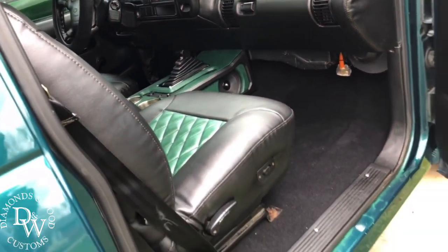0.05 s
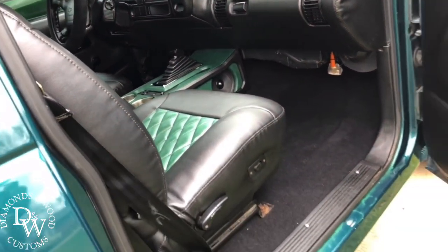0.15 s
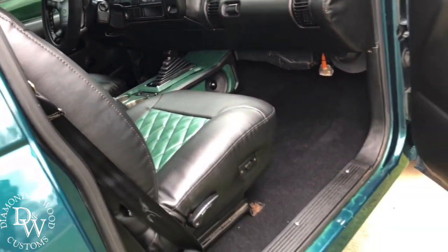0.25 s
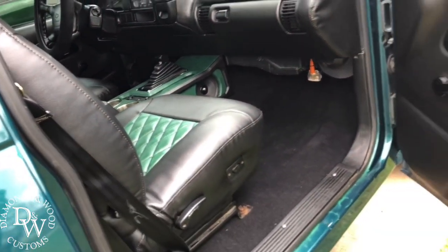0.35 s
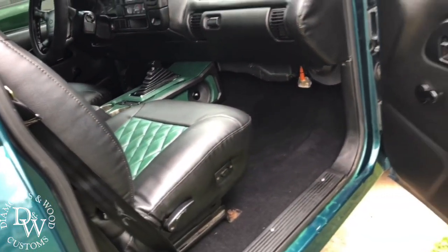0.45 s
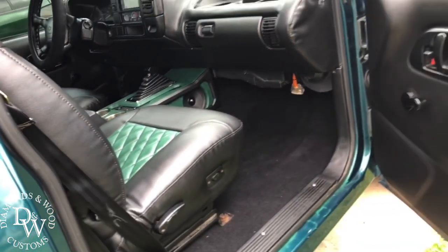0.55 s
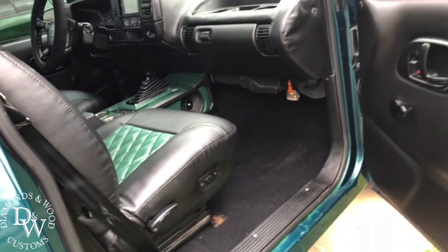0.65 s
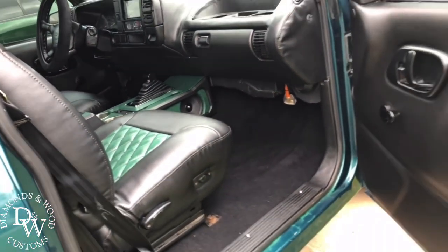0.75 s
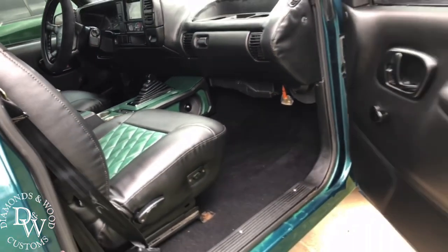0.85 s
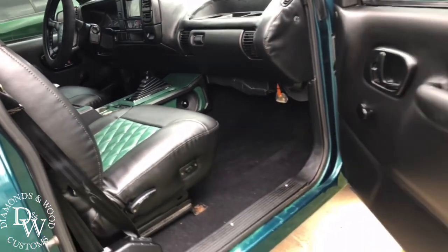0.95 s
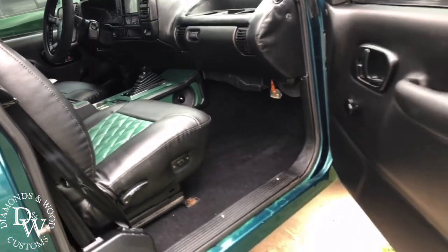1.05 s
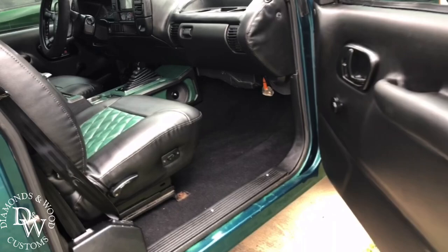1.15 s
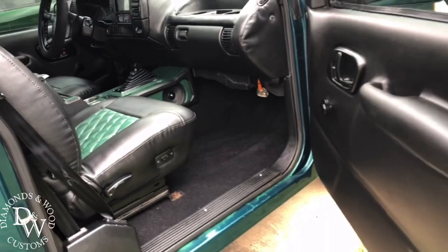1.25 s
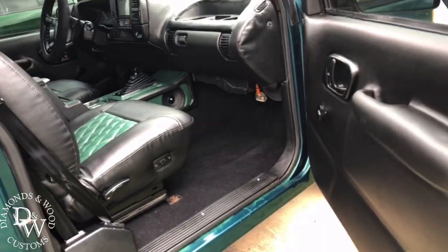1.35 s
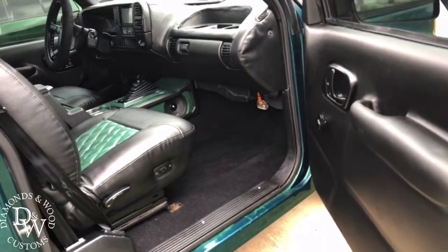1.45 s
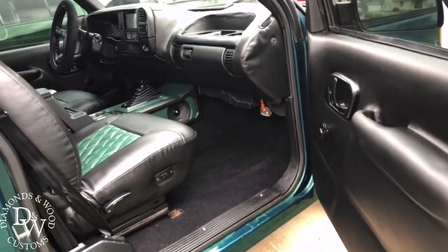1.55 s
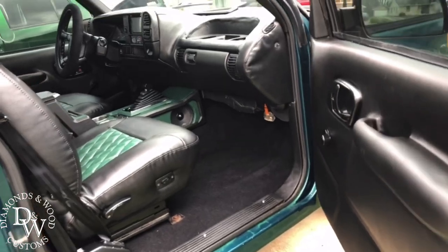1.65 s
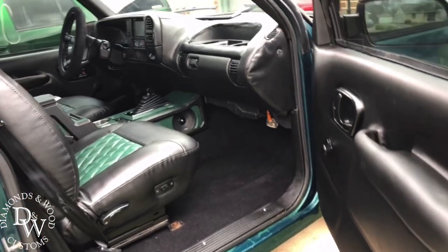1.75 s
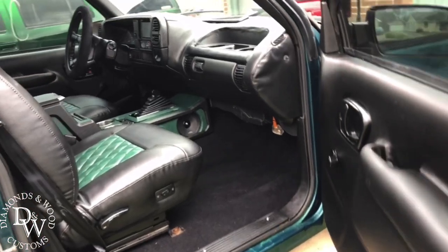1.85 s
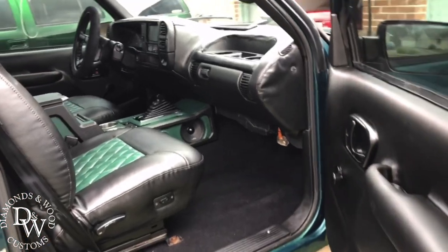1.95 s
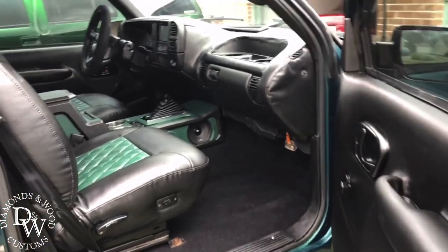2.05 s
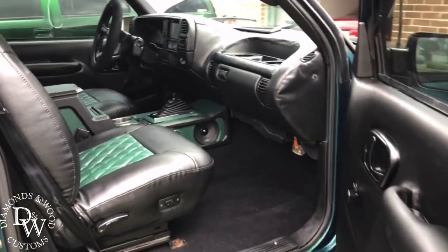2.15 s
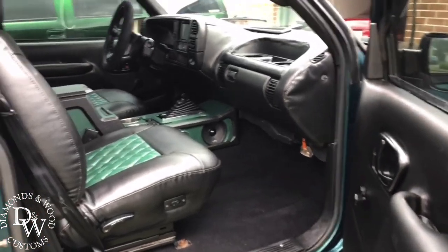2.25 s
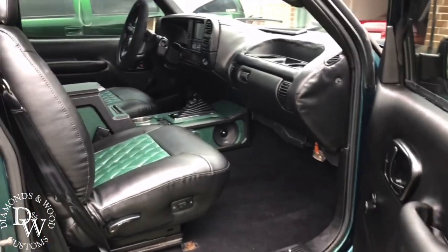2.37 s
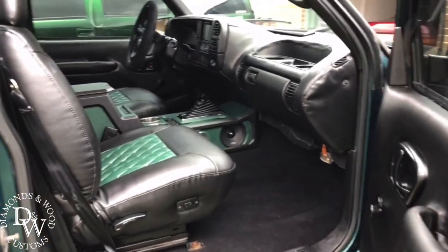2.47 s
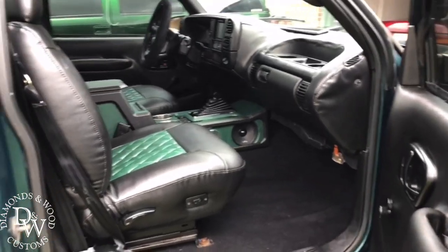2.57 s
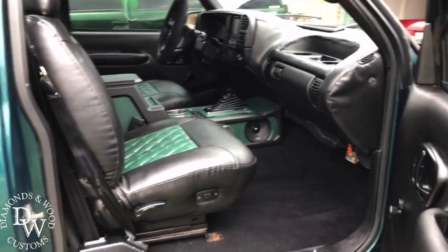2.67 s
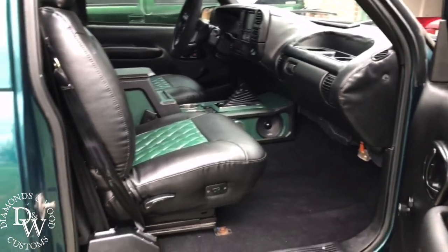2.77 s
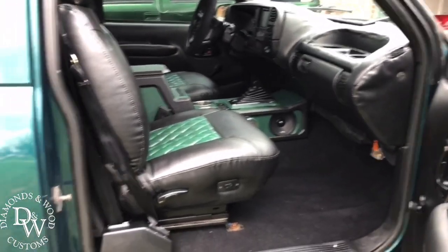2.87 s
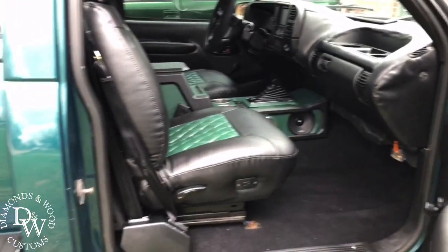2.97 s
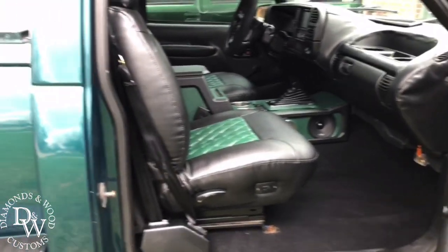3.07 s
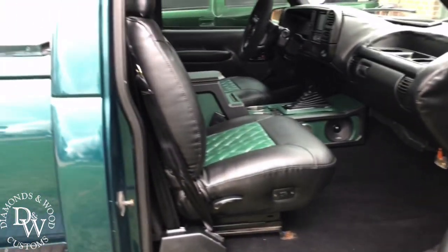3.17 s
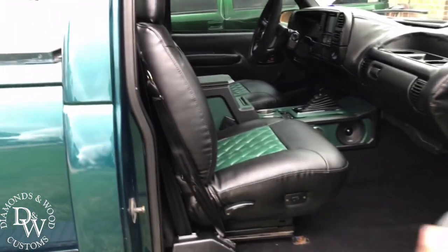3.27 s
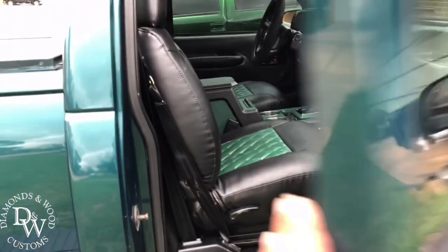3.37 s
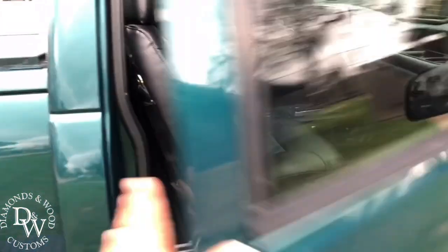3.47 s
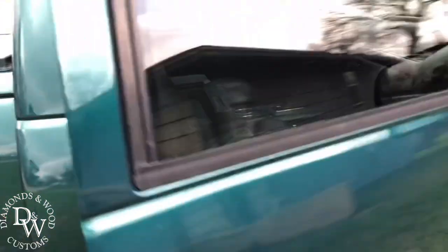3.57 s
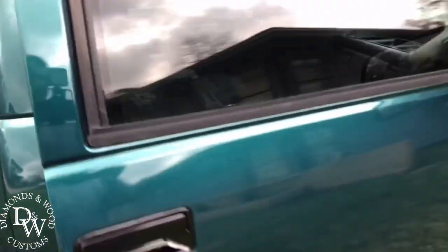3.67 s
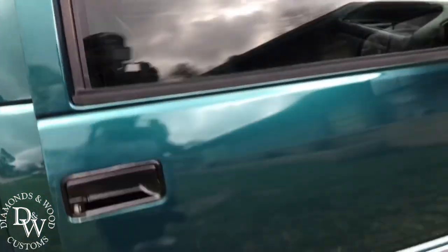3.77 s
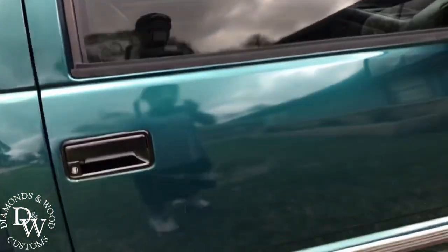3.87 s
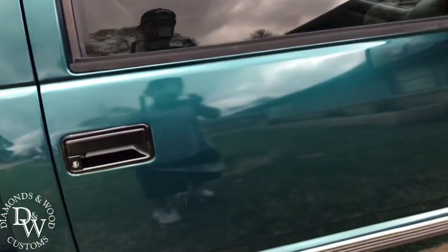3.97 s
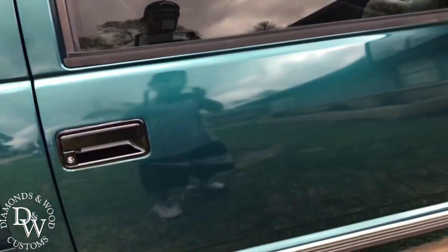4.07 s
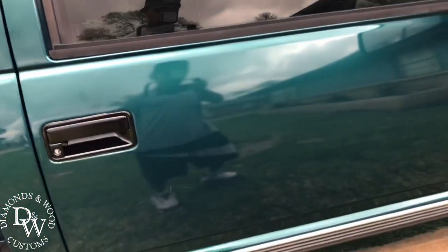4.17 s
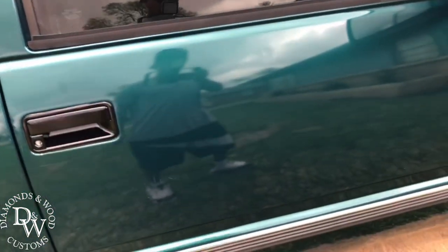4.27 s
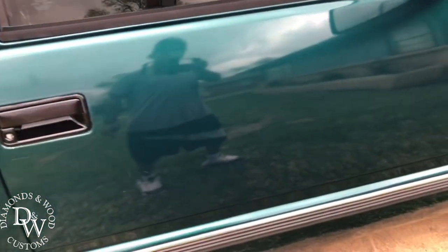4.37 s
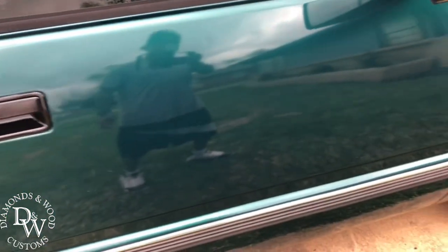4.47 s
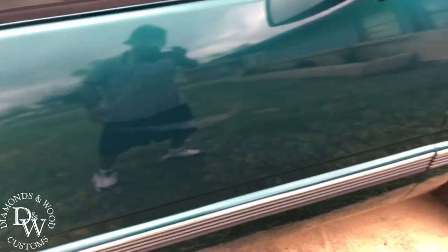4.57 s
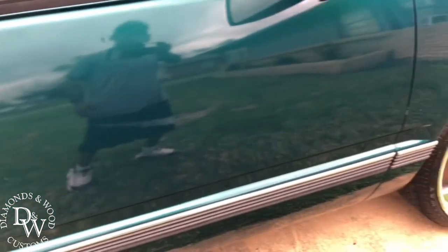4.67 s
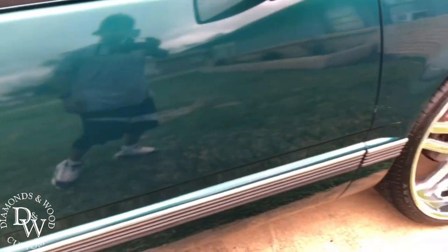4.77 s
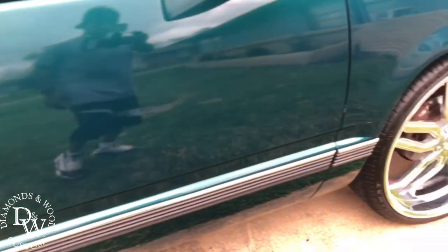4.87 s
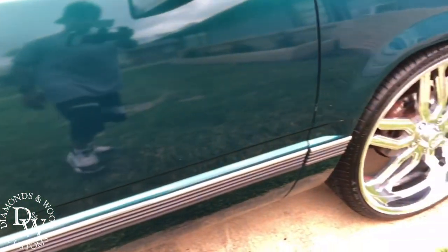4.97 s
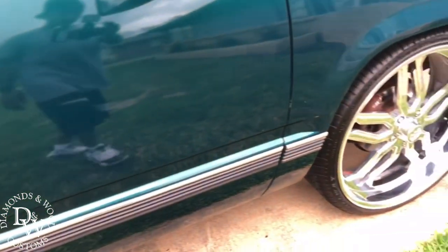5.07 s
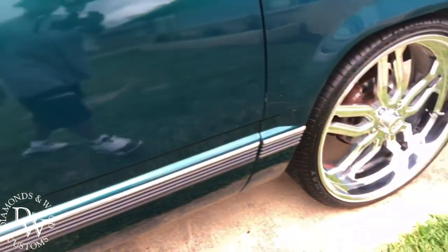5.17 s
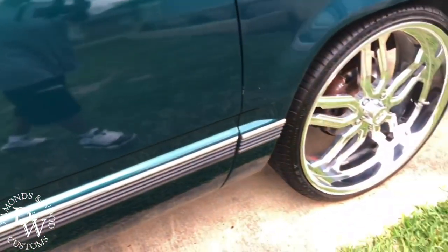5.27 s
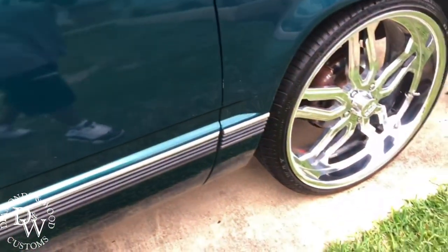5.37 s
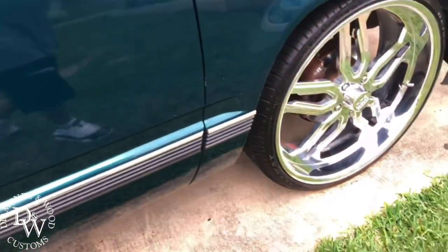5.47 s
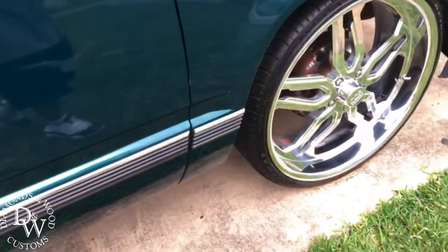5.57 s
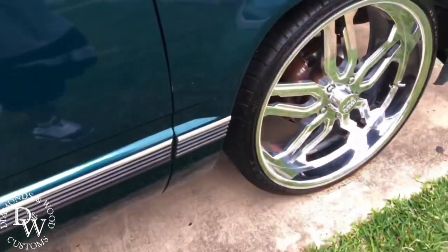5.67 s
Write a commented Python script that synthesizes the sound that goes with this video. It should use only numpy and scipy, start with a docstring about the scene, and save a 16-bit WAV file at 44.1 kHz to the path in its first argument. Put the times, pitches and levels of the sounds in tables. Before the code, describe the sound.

After faint rustling and soft bumps, a truck door is slammed once, thudding against a low, steady outdoor background.

```python
"""Pickup door shut on a driveway

One microphone, an arm's length from the door. The door pushes air ahead of it, the latch meets the
striker, the steel skin lands on its seals and shudders, the window rattles and the cab booms.
Close by are rustling clothes and a few soft bumps and ticks. Farther off are insects in the lawn,
a humming machine, and the rumble and tyre song of traffic."""
import sys
import numpy as np
from scipy import signal
from scipy.io import wavfile

SR = 44100
rng = np.random.default_rng(int(sys.argv[2]) if len(sys.argv) > 2 else 0)


def wav_record(signal):
    """Record a signal, one row per channel, as 16-bit PCM in the file named by sys.argv[1]."""
    frames = np.transpose(np.atleast_2d(signal))
    bounded = np.clip(frames, -1, 1)
    # unit amplitude maps onto the largest positive 16-bit level
    quanta = np.round(bounded * 32767).astype(np.int16)
    wavfile.write(sys.argv[1], SR, quanta)


N = 252252
TIME = np.arange(N) / SR

# traffic on the far road: t/s, rumble level/dB, tyre noise level/dB
TRAFFIC_LEVELS = [(0, -48.5, -51.5), (1.2, -50, -49), (2.9, -48, -49), (3.35, -48.5, -47),
                  (4.3, -45.5, -49.5), (5.15, -48.5, -49.5), (5.72, -47, -50)]
# spectra of the rumble and the tyre noise: f/Hz, relative density/dB
RUMBLE_SPECTRUM = [(25, -12), (45, -6), (65, 3), (85, 2.5), (115, -3), (170, -1.5), (260, -13.5),
                   (400, -17.5), (800, -46)]
TYRE_SPECTRUM = [(150, -8.5), (350, -1.5), (600, -0.5), (850, 3.5), (1120, 2.5), (1500, -4.5),
                 (2100, -12.5), (3200, -24.5), (6000, -28.5), (15000, -80)]
# note of the tyre treads: t/s, f/Hz, level/dB
TYRE_NOTE = [(0, 1110, -63), (1.7, 1115, -66), (2.15, 1126, -52), (2.45, 1086, -59.5), (4.4, 1059, -61),
             (5.2, 897, -72), (5.45, 853, -51.5), (5.72, 815, -55.5)]
# hum of a distant machine: t/s, level/dB
HUM_LEVELS = [(0, -48.5), (2, -54), (4.5, -51.5), (5.72, -51)]

# a sleeve or trouser leg moving near the microphone: peak t/s, level/dB, rise/s, fall/s
CLOTH_MOVES = [(.18, -65.5, .14, 0.088), (.36, -65, 0.054, 0.073), (.65, -61, 0.044, 0.082),
               (.82, -61, 0.053, 0.057), (.95, -63, .04, 0.069), (1.13, -62.5, .025, .04),
               (1.22, -66, .04, 0.049), (1.56, -65.5, 0.07, .08), (1.79, -62.5, 0.11, .16),
               (2.1, -64.5, .04, 0.057), (2.435, -54.5, 0.067, .018), (2.5, -69, .04, .22),
               (3.11, -66, .03, .04), (3.21, -65, .05, 0.032), (3.325, -68, .015, .04),
               (3.455, -66, .012, .015), (3.56, -67, .015, .015), (4.298, -56.5, 0.054, .03),
               (4.41, -66, 0.041, .2), (4.77, -65, .08, .09), (4.99, -63, .025, .03),
               (5.28, -60.5, 0.21, .2), (5.6, -60.5, 0.038, 0.03)]
# hiss of the cloth: f/Hz, relative density/dB
CLOTH_SPECTRUM = [(1500, 2), (3000, 5.5), (6000, 3.4), (8000, 5.2), (11000, 3.5), (15000, 7.3)]
# soft bumps of feet, hinge and rocking body: t/s, level/dB, f/Hz, t60/s
SOFT_BUMPS = [(1.405, -35.5, 103, .08), (1.451, -30, 100, 0.078), (2.069, -31, 102.4, 0.048),
              (2.851, -30, 202, 0.079), (2.889, -31, 193, 0.077), (3.142, -27.5, 181, 0.1),
              (3.178, -30, 152, 0.077), (3.566, -34, 221, 0.15), (3.62, -29, 106, 0.17),
              (4.209, -29, 74.5, 0.22), (4.268, -28, 76, 0.21)]
# ticks of trim and grit: t/s, level/dB, f/Hz, filter width/Hz, t60/s
GRIT_TICKS = [(0.9482, -49.5, 2800, 5000, 0.036), (2.851, -41, 800, 800, 0.033),
              (2.926, -49.5, 6500, 11000, 0.022), (3.002, -55.5, 4300, 700, 0.055),
              (3.267, -60, 4170, 1300, 0.091), (3.335, -60, 4700, 3000, .1),
              (3.4461, -58, 7000, 9000, 0.03), (3.466, -40.5, 2150, 1980, .04),
              (3.467, -49, 5000, 3000, 0.016), (3.623, -47.5, 4800, 12000, 0.02)]
# dull scuffs as the door is reached for and pushed: peak t/s, level/dB, rise/s, fall/s
PUSH_SCUFFS = [(3.39, -48.5, .08, 0.095), (3.64, -44.5, 0.053, 0.052)]
# air driven by the door: f/Hz, relative density/dB
AIR_SPECTRUM = [(100, 4), (250, 3.5), (450, -1.5), (750, 2), (1100, -10), (1500, -7.5), (2500, -21),
                (5000, -34.5), (15000, -47)]

# modes of the parts that ring: f/Hz, relative level/dB, t60/s
CAB_AIR_MODES = [(55, -1.5, 0.25), (90.8, -10, 0.36), (141, -0.5, 0.177), (201.7, -6, 0.13),
                 (242.7, -1.5, 0.13), (291, -2, 0.088)]   # air in the cab and the broad door skin
SHEET_METAL_MODES = [(368, -12, .16), (394, -15, .15), (448, -19, .15), (519, -16, .2), (564, -15, .19),
                     (690, -13, .22), (852, -15, .2), (1495, -20, .2), (1797, -21, .18)]
LATCH_STEEL_MODES = [(2310, -23, .12), (2866, -21, .17), (3800, -24, .12), (4031, -27, .17),
                     (4460, -29, .12), (5980, -20, .07), (6230, -25, .08), (7990, -34, .1),
                     (9370, -26, .09), (11830, -26, .07)]   # latch and striker
PAWL_SNAP_MODES = [(1480, -19, .03), (1810, -12, .045), (2090, -18, .025), (2480, -13, .035),
                   (2830, -14, .035), (3900, -27, .02)]
WINDOW_MODES = [(530, -14, .14), (624, -12, .16), (700, -13, .14), (810, -10, .18), (852, -7, .18)]
# clatter, the crowded overtones between those modes: f/Hz, relative density/dB
SHEET_METAL_CLATTER = [(100, -3.5), (240, 2), (450, -4), (750, -2.5), (1050, -5), (1400, -1.5), (1900, -18),
                       (2700, -27), (3500, -34), (15000, -53)]
LATCH_CLATTER = [(500, 2), (1300, 2.5), (1900, 6), (2500, -1.5), (3200, -2.5), (4100, -1), (6000, -4),
                 (8000, -5.5), (10000, -6.5), (15000, -13)]
WINDOW_CLATTER = [(250, -30), (450, -7), (600, 4), (820, -2), (1000, -20), (1500, -11.5), (2500, -33),
                  (8000, -42)]
# ring time of the clatter: f/Hz, t60/s
SHEET_METAL_DECAY = [(100, 0.44), (400, 0.15), (750, 0.15), (1500, 0.067), (5000, 0.14)]
LATCH_DECAY = [(1000, 0.21), (4000, 0.11), (15000, 0.13)]
WINDOW_DECAY = [(500, 0.11), (3000, 0.093)]
# the door lands (first catch, seals, second catch, hard stop):
# t/s, cab drive/dB, sheet-metal drive/dB, latch drive/dB
DOOR_BLOWS = [(3.8567, -33, -13, -22), (3.863, -25, -15, -25), (3.8698, -15.5, -6.5, -17),
              (3.8738, -10.5, -9, -12.5), (3.886, -42, -9.5, -24), (3.8925, -41, -16, -16),
              (3.9052, -15, -19, -38)]
# dull thumps of the cab as it settles: t/s, drive/dB
CAB_THUMPS = [(3.95, -15.5), (4.03, -31), (4.073, -26), (4.1497, -32.5)]


def from_db(db):
    """Decibels to gain."""
    return 10 ** (np.asarray(db) / 20)


def unit_power(x):
    """Scale to an RMS of one."""
    return x / np.sqrt(np.mean(x ** 2) + 1e-20)


def in_time(rows):
    """Each column of a curve, at every sample."""
    times, *columns = np.transpose(rows)
    return [np.interp(TIME, times, column) for column in columns]


def at_hz(points, hz):
    """Read a curve on a log-frequency axis."""
    frequencies, values = np.transpose(points)
    return np.interp(np.log(hz), np.log(frequencies), values)


def add(out, s, sound):
    """Mix a sound in at time s."""
    start = round(s * SR)
    out[start:start + len(sound)] += sound[:N - start]


def butter(x, order, hz, kind="low"):
    """Butterworth filter."""
    return signal.sosfilt(signal.butter(order, hz, kind, fs=SR, output="sos"), x)


def narrow_noise(length, hz, width_hz):
    """Unit-power noise through two resonators in series, each width_hz wide."""
    radius = np.exp(-np.pi * width_hz / SR)
    b = np.array([1, 0, -1]) * (1 - radius ** 2) / 2
    a = [1, -2 * radius * np.cos(2 * np.pi * hz / SR), radius ** 2]
    once = signal.lfilter(b, a, rng.standard_normal(length))
    return unit_power(signal.lfilter(b, a, once))


def noise_bands(spectrum):
    """Band centres and coloured noise in narrow bands; together they have unit power."""
    edges = np.geomspace(22, 17000, 25)
    centres = np.sqrt(edges[1:] * edges[:-1])
    white = rng.standard_normal((2, N))
    bands = np.array([from_db(at_hz(spectrum, hz)) * butter(white[k % 2], 2, edges[k:k + 2], "band")
                      for k, hz in enumerate(centres)])
    return centres, bands / bands.sum(axis=0).std()


def noise(spectrum):
    """Steady coloured noise of unit power."""
    return noise_bands(spectrum)[1].sum(axis=0)


def swells(rows):
    """Summed power of smooth swells, each with its own rise and fall."""
    return sum(from_db(db) ** 2 * np.exp(-((TIME - s) / np.where(TIME < s, rise, fall)) ** 2)
               for s, db, rise, fall in rows)


def ringing(modes, attack_s):
    """Response of decaying modes to a contact that builds over attack_s."""
    t = TIME[:SR]
    swing = sum(from_db(db - 60 * t / t60) * np.sin(2 * np.pi * hz * t) for hz, db, t60 in modes)
    return swing * (1 - np.exp(-t / attack_s))


def struck_body(times, levels, modes, spectrum, decay, ring_db, clatter_db, attack_s):
    """Each contact lands somewhere else: new strengths for the modes, a new wash of clatter."""
    out, t = np.zeros(N), TIME[:SR // 2]
    centres, bands = noise_bands(spectrum)
    envelopes = from_db(-60 * t / at_hz(decay, centres)[:, None]) * (1 - np.exp(-t / attack_s))
    for s, db in zip(times, levels):
        start = rng.integers(N - len(t))
        clatter = (bands[:, start:start + len(t)] * envelopes).sum(axis=0)
        add(out, s, from_db(db + clatter_db) * clatter)
        excited = [(hz, level + 2 * rng.standard_normal(), t60) for hz, level, t60 in modes]
        add(out, s, from_db(db + ring_db) * ringing(excited, attack_s))
    return out


def machine_hum():
    """A machine in the distance holds a low, unsteady note."""
    level_db, = in_time(HUM_LEVELS)
    return from_db(level_db) * narrow_noise(N, hz=86.25, width_hz=8.8)


def traffic():
    """Rumble and tyre noise carry over from the far road."""
    rumble_db, tyre_db = in_time(TRAFFIC_LEVELS)
    return from_db(rumble_db) * noise(RUMBLE_SPECTRUM) + from_db(tyre_db) * noise(TYRE_SPECTRUM)


def tyre_whine(waver_hz=15):
    """Tyre treads sing a narrow, unsteady note that sinks as the far cars pass."""
    hz, level_db = in_time(TYRE_NOTE)
    waver = butter(rng.standard_normal((2, N)), 2, waver_hz)
    phase = 2 * np.pi * np.cumsum(hz) / SR
    return from_db(level_db) * unit_power(waver[0] * np.cos(phase) + waver[1] * np.sin(phase))


def insects(peak_s=2.1, peak_db=-81.5, swell_s=3.4):
    """A thin, high chorus out in the lawn swells and fades."""
    power = swells([(peak_s, peak_db, swell_s, swell_s)])
    return np.sqrt(power) * narrow_noise(N, hz=9550, width_hz=500)


def yard_scatter(x, wet_db, t60, dull_hz, build_s=0.04):
    """House walls and ground send a weak, dull scatter back to the microphone."""
    t = TIME[:SR]
    scatter = rng.standard_normal(SR) * from_db(-60 * t / t60) * (1 - np.exp(-t / build_s))
    response = butter(scatter / np.linalg.norm(scatter), 1, dull_hz)
    return from_db(wet_db) * signal.fftconvolve(x, response)[:N]


def clothes(rest_db=-80, grain_db=1.5, catch_hz=60):
    """Close to the microphone, cloth slides on cloth: a faint hiss that catches unevenly."""
    power = from_db(rest_db) ** 2 + swells(CLOTH_MOVES)
    catching = unit_power(butter(rng.standard_normal(N), 2, catch_hz))
    return np.sqrt(power) * from_db(grain_db * catching) * noise(CLOTH_SPECTRUM)


def bumps_and_ticks():
    """Beside the truck, soft bumps ring low and trim and grit tick in brief bursts."""
    out, t = np.zeros(N), TIME[:SR // 5]
    for s, db, hz, t60 in SOFT_BUMPS:
        add(out, s, ringing([(hz, db, t60)], attack_s=0.001))
    for s, db, hz, width_hz, t60 in GRIT_TICKS:
        add(out, s, from_db(db - 60 * t / t60) * narrow_noise(len(t), hz, width_hz))
    return out


def air_rush(seal_s=3.856, peak_db=-29, rise_db_per_s=520, fall_db_per_s=2200):
    """The door is pushed with two scuffs, then squeezes air from the gap until the seal closes."""
    fade_db = np.maximum(rise_db_per_s * (seal_s - TIME), fall_db_per_s * (TIME - seal_s))
    power = from_db(peak_db - fade_db) ** 2 + swells(PUSH_SCUFFS)
    return np.sqrt(power + 1e-18) * noise(AIR_SPECTRUM)


def window_rattle(start_s=3.914, period_s=0.0525, crossing_s=0.0145, stop_after_s=0.235, swings=5):
    """The glass knocks on both sides of its channel; friction shrinks the swing in a straight line."""
    age = (np.arange(swings)[:, None] * period_s + [0, crossing_s]).ravel()
    swing = np.maximum(1 - age / stop_after_s, 1e-3)
    knock_db = -20.5 + 20 * np.log10(swing)
    return struck_body(start_s + age, knock_db, WINDOW_MODES, WINDOW_CLATTER, WINDOW_DECAY,
                       ring_db=-2.5, clatter_db=-6.5, attack_s=0.0016)


def shudder(start_s=3.928, period_s=0.0455, cycles=5):
    """The door rebounds on its seals, weaker each cycle; rows as in DOOR_BLOWS."""
    first_db = np.array([-17.5, -21, -23])   # cab, sheet metal, latch
    loss_db = np.array([14, 13, 8.3])
    return [(start_s + k * period_s, *(first_db - k * loss_db)) for k in range(cycles)]


def door_slam(pawl_s=3.8578):
    """At arm's length the pawl snaps over the striker; cab, sheet metal and latch ring at each blow."""
    times, cab_db, metal_db, latch_db = np.transpose(list(DOOR_BLOWS) + shudder())
    pawl, cab = np.zeros((2, N))
    add(pawl, pawl_s, from_db(-1.1) * ringing(PAWL_SNAP_MODES, attack_s=0.00029))
    boom = ringing(CAB_AIR_MODES, attack_s=0.003)
    for s, db in list(zip(times, cab_db)) + list(CAB_THUMPS):
        add(cab, s, from_db(db) * boom)
    metal = struck_body(times, metal_db, SHEET_METAL_MODES, SHEET_METAL_CLATTER, SHEET_METAL_DECAY,
                        ring_db=-6, clatter_db=-2, attack_s=0.00072)
    latch = struck_body(times, latch_db, LATCH_STEEL_MODES, LATCH_CLATTER, LATCH_DECAY,
                        ring_db=3.5, clatter_db=-5, attack_s=0.00038)
    return pawl + cab + metal + latch


def scene():
    """From the driveway, in mono: the door up close, the yard around it, the road far behind."""
    door = door_slam() + window_rattle() + air_rush()
    far = machine_hum() + traffic() + tyre_whine() + insects()
    near = clothes() + bumps_and_ticks()
    reflections = yard_scatter(door, wet_db=-19, t60=0.45, dull_hz=350)
    return (door + reflections + far + near)[None]


def record(dry, low_cut_hz=38, high_cut_hz=15900):
    """The microphone chain cuts the deepest bass, rounds the peaks and cuts the top."""
    thinned = butter(dry, 3, low_cut_hz, "high")
    rounded = 1.057 * np.tanh(thinned / 1.14)
    return signal.sosfilt(signal.ellip(10, .1, 80, high_cut_hz, fs=SR, output="sos"), rounded)


dry = scene()
out = record(dry)
wav_record(out)
```